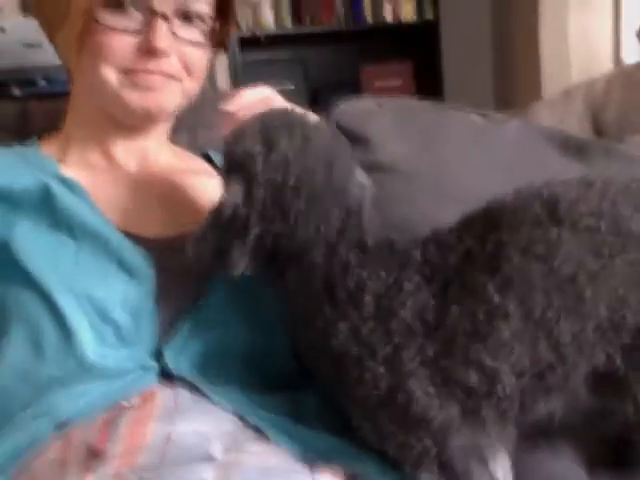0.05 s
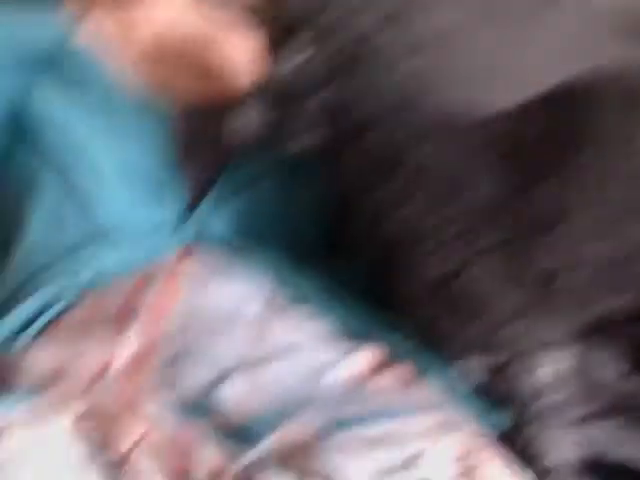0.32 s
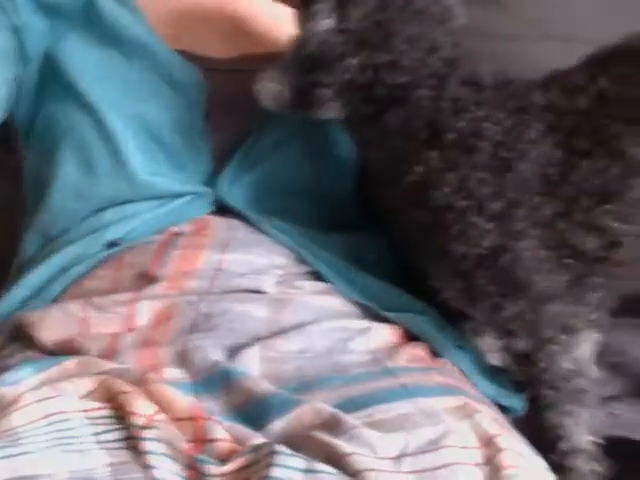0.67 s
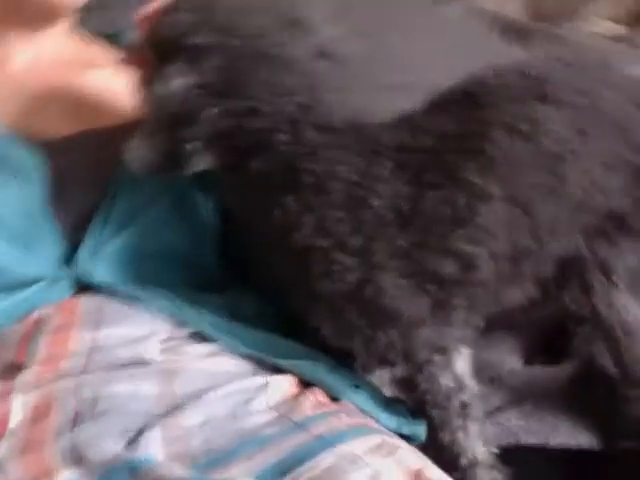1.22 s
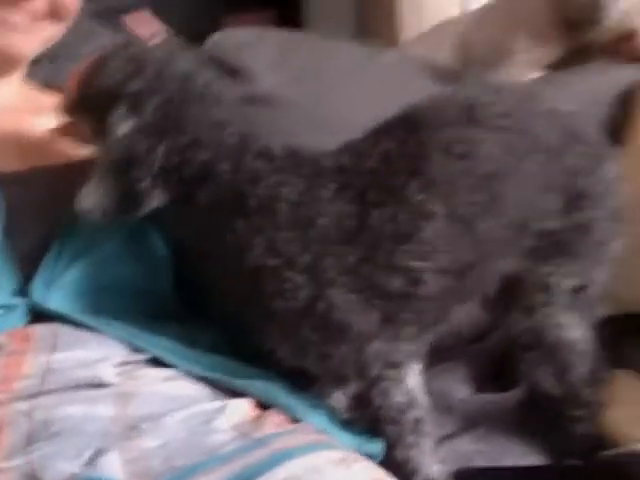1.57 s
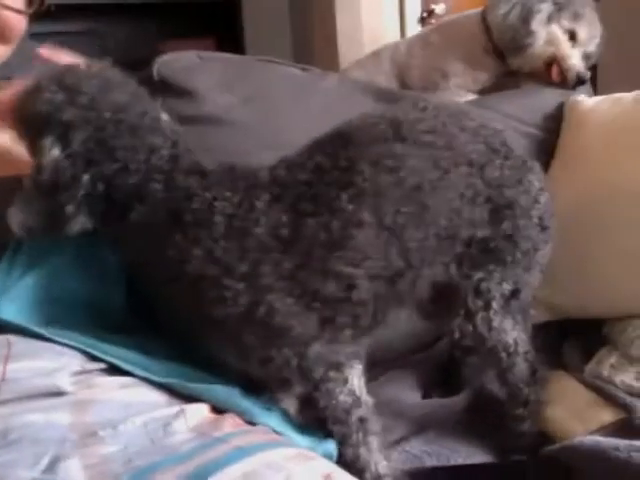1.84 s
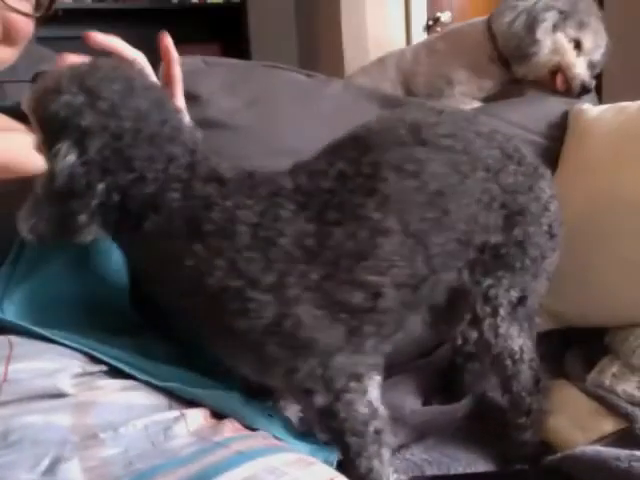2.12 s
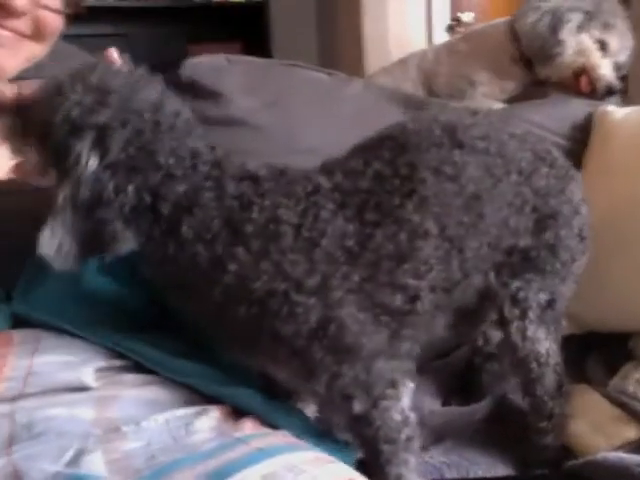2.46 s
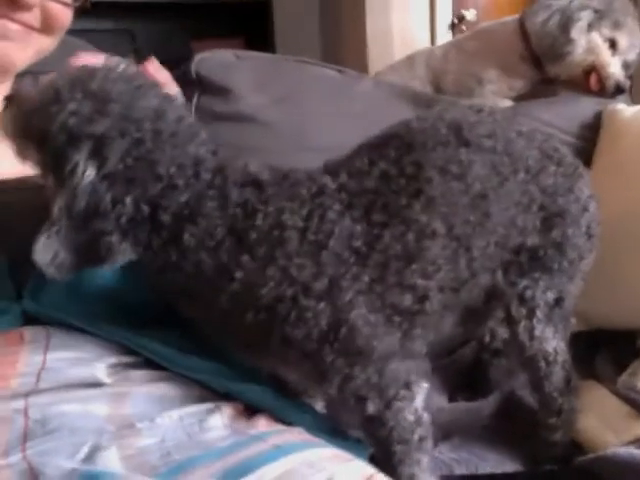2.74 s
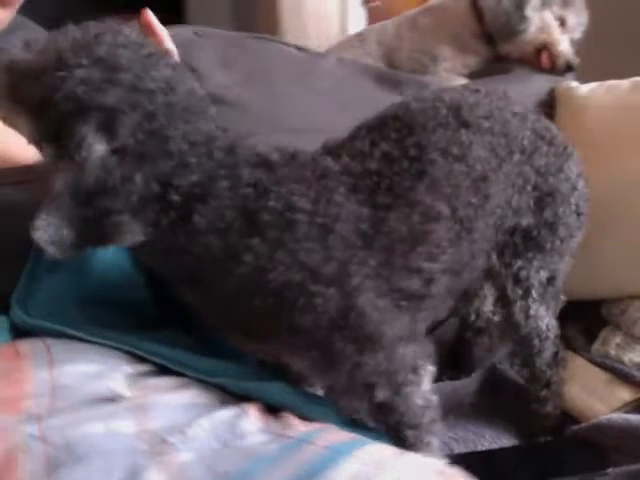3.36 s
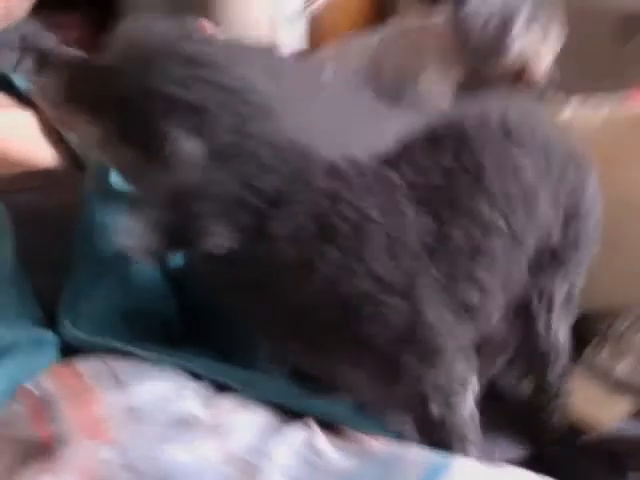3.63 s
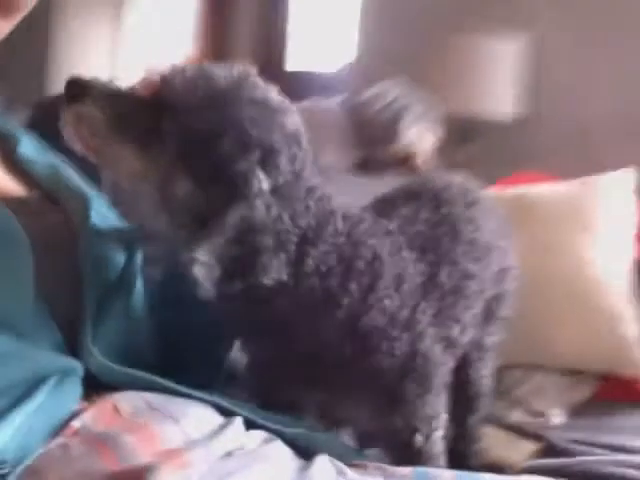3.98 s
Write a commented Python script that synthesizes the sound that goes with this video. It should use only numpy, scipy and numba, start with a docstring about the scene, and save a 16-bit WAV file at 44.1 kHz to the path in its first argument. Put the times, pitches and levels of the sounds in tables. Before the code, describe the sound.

Fingers rub through a dog's thick coat close to the microphone: short scratchy strokes with one nail tick, then a long, swelling rasp. Cloth shuffles and soft sofa bumps lie underneath, in a quiet living room.

```python
"""Fingers rub through a dog's thick coat, close to the microphone: short strokes, then one long rasp.
Countless hairs slip and flick, brighter the faster the hand moves; once the hand catches with a
narrower hiss and a nail tick. Underneath, cloth shuffles and the sofa takes a few soft bumps.
The place is a quiet, furnished living room with a faint hum; both channels carry the same sound."""
import sys
import numpy as np
from scipy import signal
from scipy.fft import rfft, irfft
from scipy.io import wavfile
from scipy.ndimage import uniform_filter1d
from numba import njit

SR = 44100
rng = np.random.default_rng(int(sys.argv[2]) if len(sys.argv) > 2 else 0)


def wav_record(signal):
    """Record a signal, one row per channel, as 16-bit PCM in the file named by sys.argv[1]."""
    frames = np.transpose(np.atleast_2d(signal))
    bounded = np.clip(frames, -1, 1)
    # unit amplitude maps onto the largest positive 16-bit level
    quanta = np.round(bounded * 32767).astype(np.int16)
    wavfile.write(sys.argv[1], SR, quanta)


N = 176400

# Room tone. Each row: frequency in Hz, relative level in dB.
ROOM_SPECTRUM = [(18, -55), (30, -35.5), (92, -8), (130, -5), (168, -6.5), (230, -6), (299, -5.5),
                 (324, -8), (389, -4.5), (518, -9.5), (830, -6), (1110, -13.5), (1720, -11.5),
                 (2910, -21.5), (4540, -21), (12900, -42), (15500, -33)]
# Faint household hum. Each row: frequency in Hz, level in dB.
HUM_TONES = [(119, -78), (188, -77.5), (288, -76.5), (378, -77.5)]
# Cloth shifting. Each row: start, rise, hold and fall in seconds, level in dB.
CLOTH_SHUFFLES = [(0.104, .13, .015, 0.042, -56), (0.272, 0.057, 0.061, .05, -53),
                  (0.408, 0.08, 0.17, .1, -68), (1.49, .18, .03, 0.11, -60), (2.196, 0.15, .3, 0.45, -63)]
# Dull tone of the cloth. Each row: frequency in Hz, relative level in dB.
CLOTH_SPECTRUM = [(70, -18), (130, -5.5), (300, 0.5), (560, 4.5), (800, -2), (1200, -28), (15000, -70)]
# Bumps on the sofa. Each row: start in seconds, pitch in Hz, level in dB, seconds to fall by 60 dB.
SOFA_BUMPS = [(.13, 200, -49.5, 0.051), (0.242, 273, -41, .05), (.375, 210, -45, 0.047),
              (0.957, 187, -46, 0.057), (2.281, 213, -35, 0.027), (3.312, 150, -53, .08),
              (3.56, 120, -52, 0.093)]
# Rustle of the hand resting in the coat. Each row: time in seconds, level in dB.
RESTING_LEVELS = [(0, -75), (.07, -77), (.12, -62), (.45, -60.5), (1.05, -55.5), (1.33, -64), (1.8, -62),
                  (1.95, -72.5), (2.07, -67.5), (2.3, -61)]
# The hand drags and catches. Each row: start, rise, hold and fall in seconds, level in dB.
HAND_CATCHES = [(.38, 0.061, 0.15, 0.055, -64.5), (0.509, 0.054, 0.021, 0.023, -52),
                (0.574, 0.018, .03, .055, -42)]
# Narrow hiss of the catch. Each row: frequency in Hz, relative level in dB.
CATCH_SPECTRUM = [(300, -29), (750, -13.5), (960, -4.5), (1350, -24.5), (1800, -16), (2150, -8.5),
                  (2550, -3), (3050, -10), (3800, -9.5), (4450, 0), (5400, -8.5), (6500, -23), (7500, -45),
                  (12000, -49), (15500, -60)]
# Fingernail tick. Each row: start in seconds, level in dB.
NAIL_TICKS = [(.588, -28)]
# Short strokes through the coat. Each row: start, rise, hold and fall in seconds, level in dB,
# treble and body offsets in dB, hiss resonance in Hz.
SHORT_STROKES = [(.127, 0.045, 0.06, 0.1, -38.5, 3.5, 1, 4300),
                 (0.222, 0.064, 0.059, 0.15, -45.5, 3.5, 3, 4900),
                 (0.583, 0.17, 0.095, 0.13, -38.5, 1.5, 0, 4460),
                 (0.783, 0.068, 0.042, 0.2, -40, -0.5, -6.5, 4470),
                 (0.875, 0.072, 0.026, .1, -43.5, -0.5, -1.5, 5960),
                 (1.033, 0.11, 0.017, 0.14, -36.5, -0.5, -4.5, 6200),
                 (1.363, 0.095, 0.032, 0.094, -48.5, -3.5, 3.5, 6100),
                 (1.479, 0.083, .11, 0.14, -46.5, -2.5, -2, 5800),
                 (1.638, 0.045, .015, .05, -51, 6, -4, 5600),
                 (2.086, 0.15, 0.028, 0.047, -51.5, 5.5, 2.5, 4600)]
# Tone of the short strokes, as coloured by the microphone.
# Each row: frequency in Hz, relative level in dB.
STROKE_SPECTRUM = [(71, -49), (120, -19), (245, -14), (282, -14), (319, -16), (367, -19.5), (407, -15),
                   (498, -12.5), (552, -12), (719, -9.5), (812, -6), (936, -4), (1040, -9), (1150, -6.5),
                   (1590, -2.5), (1760, 1.5), (2290, 1.5), (2920, -8.5), (4390, -2.5), (5610, -8.5),
                   (6460, -9), (7760, -13), (9710, -12), (13200, -30.5), (15500, -39)]
# Course of the long rub. Each row: time in seconds, level in dB, hiss offset in dB,
# hiss resonance in Hz, treble and body offsets in dB.
RUB_COURSE = [(2.28, -71, 11, 4500, 5, 13), (2.33, -60.5, 2, 4500, 7, 9), (2.39, -51.5, 3, 4530, 5.5, 7.5),
              (2.63, -44.5, -3, 4660, 1, 3.5), (2.71, -40.5, 0.5, 5670, 2.5, 3),
              (2.93, -38, -1.5, 5530, -1.5, 1.5), (3.18, -35.5, -5, 5300, -6.5, -3),
              (3.31, -33, -4, 4630, -3.5, -6.5), (3.44, -34, 1, 4400, -1, -10),
              (3.53, -36, 2.5, 4300, 3, -5.5), (3.66, -36.5, 0, 5200, 4.5, -9),
              (3.84, -37.5, -1.5, 3450, 1.5, -9), (3.94, -40.5, -6, 5460, -2, -3),
              (4.0, -45, -5, 5470, -1, -3)]
# Tone of the long rub, as coloured by the microphone. Each row: frequency in Hz, relative level in dB.
RUB_SPECTRUM = [(71, -51), (120, -24), (147, -31), (180, -21), (212, -21.5), (294, -20), (332, -30),
                (375, -22), (469, -18.5), (498, -22), (552, -20), (917, -10), (1240, -11.5), (1560, -1.5),
                (1870, 0), (2490, -4), (2920, -9), (3170, -7), (4570, -6), (7300, -11.5), (7920, -17),
                (9320, -12.5), (11400, -23), (12900, -22.5), (15500, -31.5)]

BODY_HZ, RASP_HZ, TREBLE_HZ, SHEEN_HZ = 1190, 2920, 7500, 10800  # where the friction bands meet
FLICKS_PER_S, FLICK_SPREAD_DB, HISS_DB = 9000, 2.4, -3
TUFTS_PER_S, TUFT_DB = 200, 0.78
TREBLE_GROWTH, BODY_GROWTH = 1.66, 0.6  # powers of hand speed
SHEEN_GROWTH = 0.96  # the topmost band grows faster than the rest, by this power of the rub's strength
STROKE_SHEEN_DB, RUB_SHEEN_DB = -39, -34.5  # levels at which sheen and treble have equal gain


def undb(db):
    """Decibels to gain."""
    return 10 ** (np.asarray(db) / 20)


def unit(x):
    """Scale to an rms of 1."""
    return x / np.sqrt(np.mean(x ** 2))


def decay(age, t60):
    """Exponential fall of 60 dB in t60 seconds."""
    return np.exp(-np.log(1000) * age / t60)


def colour(x, spectrum):
    """Filter by a spectrum of (Hz, dB) points, falling away below the lowest."""
    freqs = np.arange(N // 2 + 1) * SR / N + 1e-3
    hz, db = np.array(spectrum).T
    gain = undb(np.interp(np.log(freqs), np.log(hz), db))
    return irfft(rfft(x) * gain * np.minimum(freqs / hz[0], 1) ** 2, N)


def split(x, hz, order=8):
    """The parts of a sound below and above a frequency."""
    freqs = np.arange(N // 2 + 1) * SR / N
    low = irfft(rfft(x) / (1 + (freqs / hz) ** order), N)
    return low, x - low


def wander(per_s):
    """Smooth random drift with an rms of 1."""
    span = max(int(SR / per_s), 1)
    steps = np.repeat(rng.standard_normal(N // span + 1), span)
    return unit(uniform_filter1d(steps, span)[:N])


def gesture(t, start, rise, hold, fall):
    """Speed of a movement, 0 to 1: eases up, holds, eases down."""
    ramp = np.interp(t, start + np.cumsum([0, rise, hold, fall]), [0, 1, 1, 0])
    return np.sin(np.pi / 2 * ramp) ** 2


def swells(t, moves):
    """Summed envelope of several movements, each at its own level."""
    return sum(undb(db) * gesture(t, *timing) for *timing, db in moves)


def room_tone(t, air_db=-64, waver_db=-0.4):
    """The air of a quiet living room, with a wavering hum."""
    air = unit(colour(rng.standard_normal(N), ROOM_SPECTRUM))
    air *= undb(air_db + waver_db * wander(2.87))
    hum = sum(undb(db) * np.sqrt(2) * np.sin(2 * np.pi * hz * t + 0.89 * wander(9))
              for hz, db in HUM_TONES)
    return air + hum


def room_echo(x, t, t60=0.63, echo_db=-17.5):
    """Add the short, soft reverberation of a furnished room, well behind the close sound."""
    tail = rng.standard_normal(N) * decay(t, t60)
    soft_tail = split(tail, TREBLE_HZ, order=4)[0] / np.linalg.norm(tail)
    return x + undb(echo_db) * signal.fftconvolve(x, soft_tail)[:N]


def near_scatter(x, t, t60=0.022, scatter_db=-11, above_hz=2600, shifts_per_s=3.95):
    """Two sets of close reflections off hand, dog and cushions trade places: a shifting, hollow tone."""
    reflections = rng.standard_normal((2, 1024)) * decay(t[:1024], t60)
    low, high = split(x, above_hz)
    first, second = (signal.fftconvolve(high, taps / np.linalg.norm(taps))[:N] for taps in reflections)
    angle = np.pi / 2 * shifts_per_s * t
    scattered = np.cos(angle) * first + np.sin(angle) * second
    return low + (high + undb(scatter_db) * scattered) / np.hypot(1, undb(scatter_db))


def sofa_bumps(t, attack_s=0.0012, low_cut_hz=80):
    """Padded knocks that die within a few cycles; the microphone loses their deepest part."""
    knocks = 0
    for start, hz, db, t60 in SOFA_BUMPS:
        age = np.maximum(t - start, 0)
        envelope = (1 - np.exp(-age / attack_s)) * decay(age, t60)
        knocks += undb(db) * envelope * np.sin(2 * np.pi * hz * age)
    return split(knocks, low_cut_hz, order=4)[1]


def friction(spectrum):
    """Dense flicks of single hairs or fibres over a smooth hiss, swelling tuft by tuft."""
    flicks = (rng.random(N) < FLICKS_PER_S / SR) * rng.choice([-1, 1], N)
    strength = undb(FLICK_SPREAD_DB * np.minimum(rng.exponential(size=N), 3.3))
    slip = unit(flicks * strength) + undb(HISS_DB) * rng.standard_normal(N)
    tufts = undb(TUFT_DB * wander(TUFTS_PER_S))
    return unit(colour(slip * tufts, spectrum))


def cloth_shuffles(t):
    """Clothes and cushions shift with a low shuffle."""
    return friction(CLOTH_SPECTRUM) * swells(t, CLOTH_SHUFFLES)


def resting_hand(t):
    """The coat keeps rustling faintly under the hand between strokes."""
    times, db = np.array(RESTING_LEVELS).T
    return friction(STROKE_SPECTRUM) * undb(np.interp(t, times, db))


def hand_catch(t, tick_decay_s=0.00036):
    """The hand drags, then lets go with a narrow hiss and a nail tick."""
    sound = swells(t, HAND_CATCHES) * friction(CATCH_SPECTRUM)
    for start, db in NAIL_TICKS:
        envelope = (t > start) * np.exp(-np.abs(t - start) / tick_decay_s)
        tick = colour(rng.standard_normal(N) * envelope, CATCH_SPECTRUM)
        sound += undb(db) * tick / np.abs(tick).max()
    return sound


@njit
def hand_hollow(x, hz, width_hz):
    """The hollow under the hand resonates: a band-pass with gain 1 at its moving centre."""
    ring = np.empty(len(x))
    band_state, low_state = 0., 0.
    for i in range(len(x)):
        tuning, damping = np.tan(np.pi * hz[i] / SR), width_hz / hz[i]
        band = (band_state + tuning * (x[i] - low_state)) / (1 + tuning * (tuning + damping))
        band_state = 2 * band - band_state
        low_state += 2 * tuning * band
        ring[i] = damping * band
    return ring


def coat_bands(spectrum, hollow_hz, width_hz=1900., plain_db=-1.24, ring_db=-7.5):
    """Coat friction in five bands, low to high; the hiss rings in the hollow under the hand."""
    body, rest = split(friction(spectrum), BODY_HZ)
    rasp, rest = split(rest, RASP_HZ)
    hiss, rest = split(rest, TREBLE_HZ, order=16)
    treble, sheen = split(rest, SHEEN_HZ, order=16)
    hiss = undb(plain_db) * hiss + undb(ring_db) * hand_hollow(hiss, hollow_hz, width_hz)
    return body, rasp, hiss, treble, sheen


def short_strokes(t):
    """Fingers brush the coat close to the microphone: dull body comes first, treble only at speed."""
    body_power, mid_power, treble_power = np.zeros((3, N))
    resonances = []
    for start, rise, hold, fall, db, treble_db, body_db, hz in SHORT_STROKES:
        speed = gesture(t, start, rise, hold, fall)
        body_power += (undb(db + body_db) * speed ** BODY_GROWTH) ** 2
        mid_power += (undb(db) * speed) ** 2
        treble_power += (undb(db + treble_db) * speed ** TREBLE_GROWTH) ** 2
        resonances.append((start + rise + hold / 2, hz))
    body_gain, mid_gain, treble_gain = np.sqrt([body_power, mid_power, treble_power])
    hollow_hz = np.interp(t, *np.array(resonances).T)
    body, rasp, hiss, treble, sheen = coat_bands(STROKE_SPECTRUM, hollow_hz)
    top = treble + sheen * (mid_gain / undb(STROKE_SHEEN_DB)) ** SHEEN_GROWTH
    return body_gain * body + mid_gain * (rasp + hiss) + treble_gain * top


def long_rub(t):
    """One close, unbroken rub through the coat that swells and thins out in the bass."""
    times, *columns = np.array(RUB_COURSE).T
    db, hiss_db, hollow_hz, treble_db, body_db = (np.interp(t, times, column) for column in columns)
    body, rasp, hiss, treble, sheen = coat_bands(RUB_SPECTRUM, hollow_hz)
    top = treble + sheen * undb(db - RUB_SHEEN_DB) ** SHEEN_GROWTH
    rub = undb(body_db) * body + rasp + undb(hiss_db) * hiss + undb(treble_db) * top
    return (t > times[0]) * undb(db) * rub


def scene():
    """Hand, coat and sofa up close, the room behind; the same in both channels."""
    t = np.arange(N) / SR
    coat = short_strokes(t) + resting_hand(t) + long_rub(t) + hand_catch(t)
    close = near_scatter(coat + cloth_shuffles(t) + sofa_bumps(t), t)
    return np.tile(room_echo(close, t) + room_tone(t), (2, 1))


def record(dry):
    """The recorder cuts the top steeply."""
    top_hz = 15550
    return signal.sosfilt(signal.ellip(10, .2, 80, top_hz, fs=SR, output="sos"), dry)


dry = scene()
out = record(dry)
wav_record(out)
```